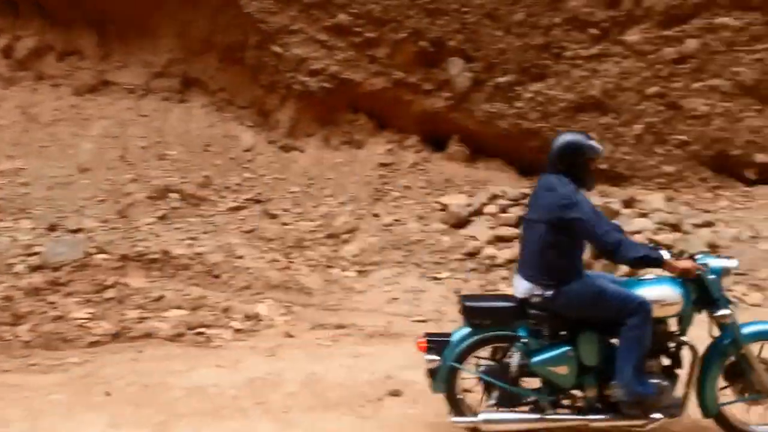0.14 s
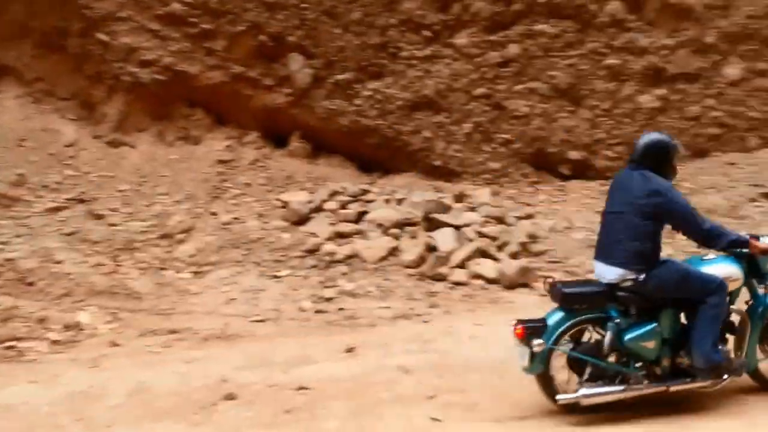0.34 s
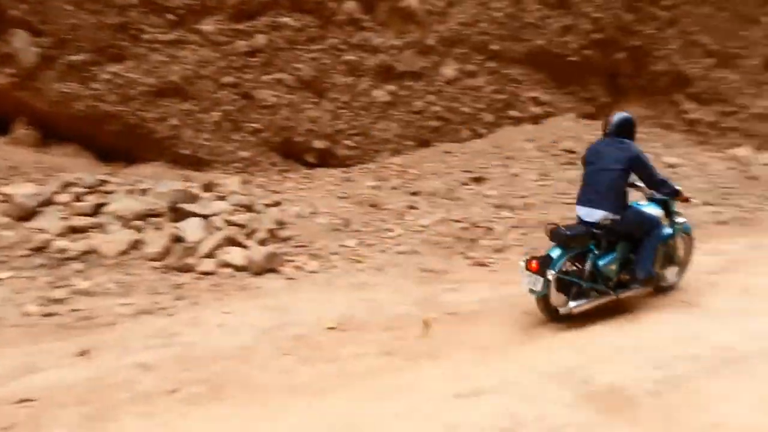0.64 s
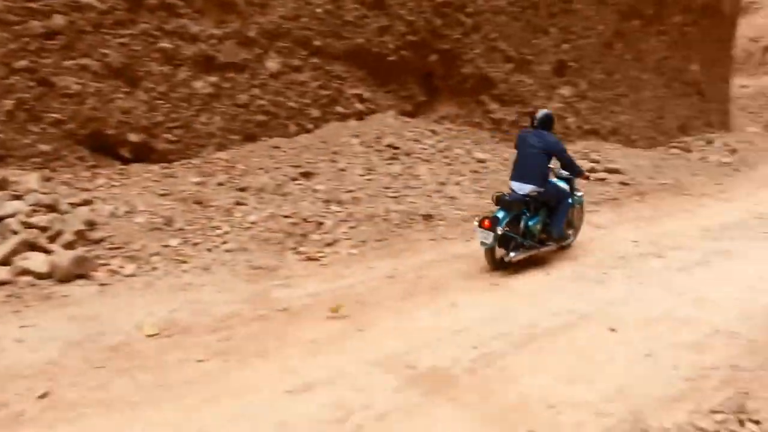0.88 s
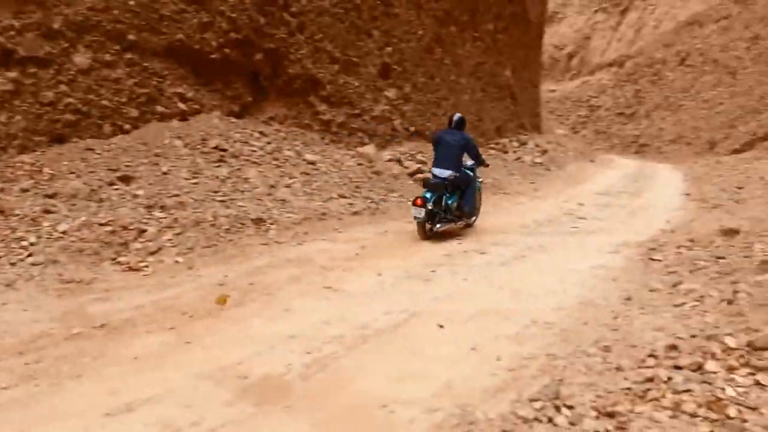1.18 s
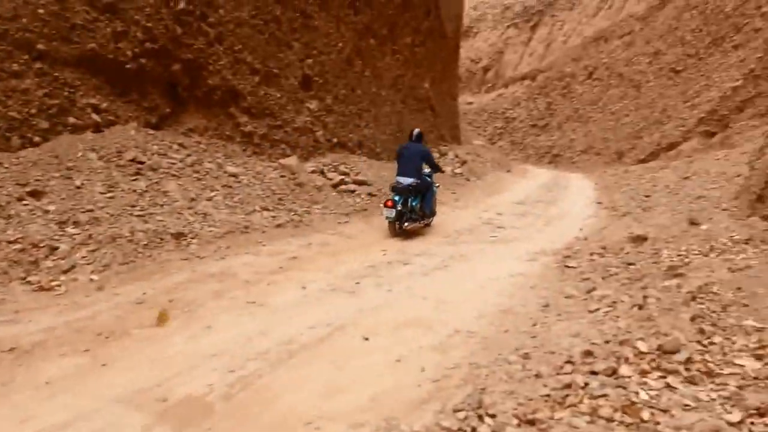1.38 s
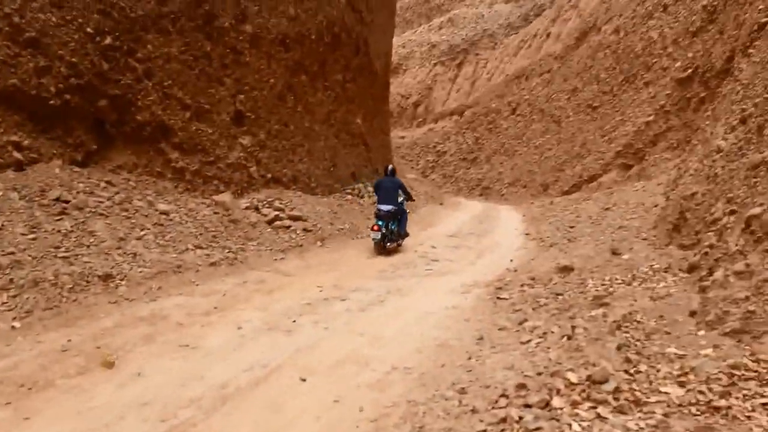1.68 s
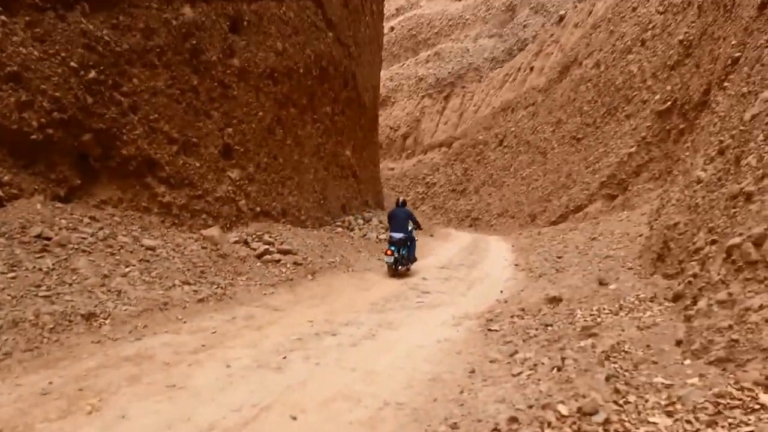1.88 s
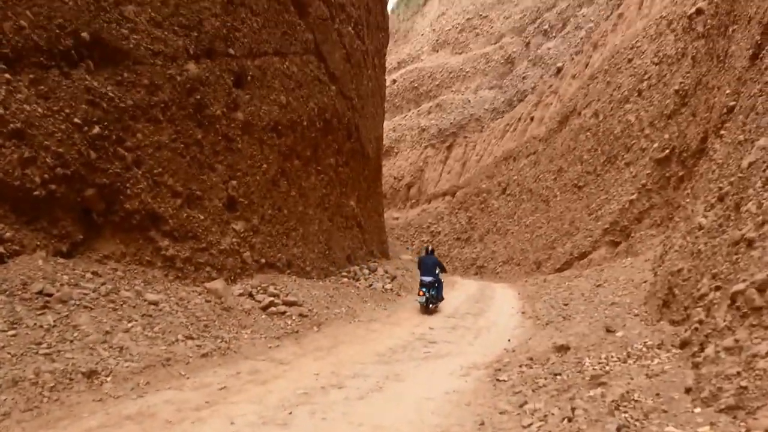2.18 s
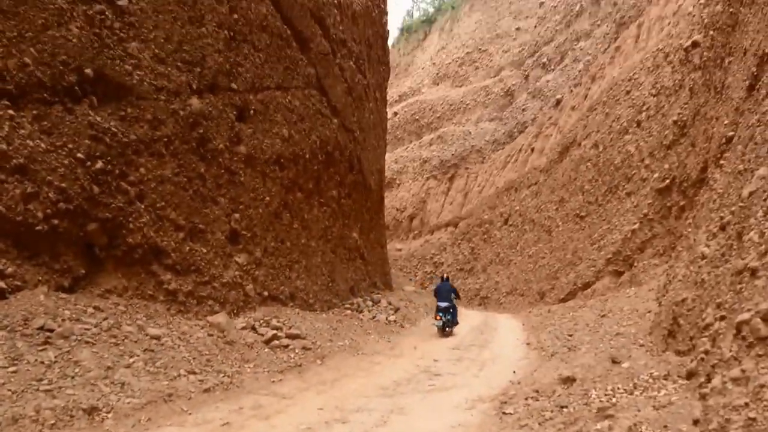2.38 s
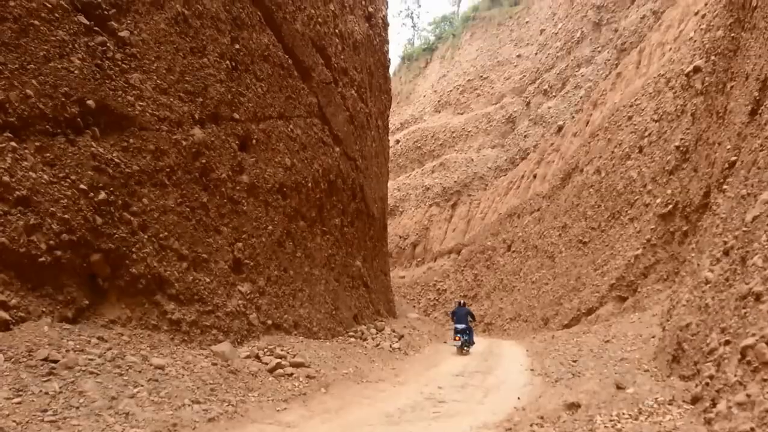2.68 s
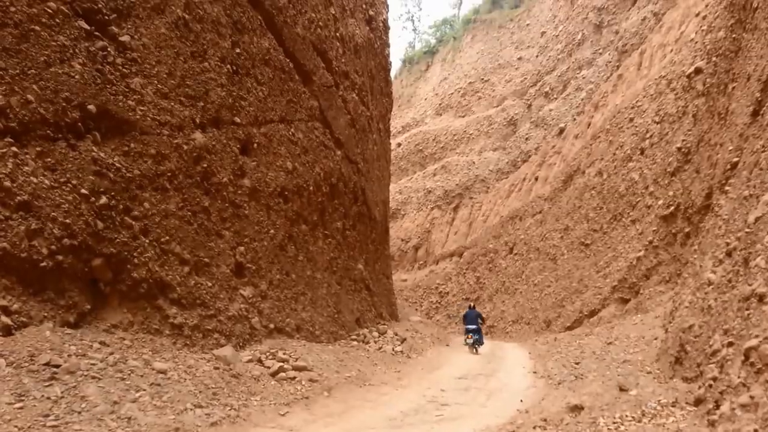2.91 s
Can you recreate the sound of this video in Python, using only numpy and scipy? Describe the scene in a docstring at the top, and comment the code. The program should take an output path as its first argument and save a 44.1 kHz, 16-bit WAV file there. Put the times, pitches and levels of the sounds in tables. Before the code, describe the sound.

A single-cylinder motorcycle thumps past very close on a dirt road, then rides away

```python
"""A dirt road between earth banks: a single-cylinder motorcycle passes close and rides off.
Each firing rings the damped modes of the exhaust pipe and cracks at its mouth as a noise burst.
The banks return delayed echoes of the thumps and a diffuse tail; a sine hum glides below them.
Shaped noise gives the rumble, the tyre and engine hiss and the gusts on one microphone port at a time.
A fast limiter clips and ducks on the loudest beats."""
import sys
import numpy as np
from scipy import signal
from scipy.fft import rfft, irfft
from scipy.io import wavfile
from scipy.ndimage import uniform_filter1d

SR = 44100
rng = np.random.default_rng(int(sys.argv[2]) if len(sys.argv) > 2 else 0)


def wrap_up_sound(samples):
    """Save the sound to the file named by the first command line argument, as 16-bit audio."""
    columns = np.atleast_2d(samples).T
    # keep every value between -1 and 1, then stretch to whole-number steps
    tamed = np.clip(columns, -1, 1)
    steps = np.round(tamed * 32767).astype(np.int16)
    wavfile.write(sys.argv[1], SR, steps)


N = 134505

# The pipe as heard while the bike turns away: (time [s], thump centre frequency [Hz],
# upper mode level re thump [dB], hum centre frequency [Hz], hum level [dB], hold of a 0 dB thump [s])
PIPE_COURSE = [(0, 165, -9, 121.7, -24.5, .003), (.7, 140, -11, 126, -25, .0055),
               (.82, 160.3, -13, 134, -16.5, .002), (1.2, 187, -17, 170, -18, .002),
               (1.5, 214.8, -27, 150, -22, .002), (1.95, 235, -14.5, 152, -22, .003),
               (2.25, 131, -4, 140, -26, .016), (3.05, 128.7, -5, 142, -29, .016)]
# Course of the noise bed: (time [s], rumble level [dB], hiss level [dB], hiss hollowness [0-1])
BED_COURSE = [(0, -22, -20.5, 0.07), (.6, -18.5, -19, 0.21), (.9, -19, -20.5, 0.16), (1.2, -17, -16, 0.35),
              (1.5, -16.5, -16.5, 0.43), (1.8, -16, -14.5, 0.6), (2.1, -16, -24, 0.33),
              (2.4, -15.5, -22.5, 0.34), (2.7, -19.5, -34, 0), (3.05, -24, -27, 0.31)]
# Relative spectrum of the full hiss, also used for cracks and grit: (frequency [Hz], level [dB])
FULL_SPECTRUM = [(200, -47), (500, 7.5), (1000, 8.5), (2200, 2.5), (4000, 2.5), (6300, 4), (7500, 2.5),
                 (9500, -11), (11000, -12), (12500, -47)]
BEAT_LEAD_S = .008  # each beat waveform starts this long before its main trough


def amp(db):
    """Decibel law: level to amplitude ratio."""
    return 10 ** (np.asarray(db) / 20)


def evened(x):
    """Normalisation to unit root-mean-square."""
    return x / np.sqrt(np.mean(x ** 2) + 1e-20)


def read(points, hz):
    """Interpolation along a logarithmic frequency axis."""
    f, value = np.transpose(points)
    return np.interp(np.log(hz + 1), np.log(f + 1), value)


def column(table, k, t):
    """Linear interpolation of column k in time."""
    rows = np.array(table)
    return np.interp(t, rows[:, 0], rows[:, k])


def add(mix, s, sound):
    """Superposition: sounds sum sample by sample, here from time s onward."""
    at = max(round(s * SR), 0)
    part = mix[at:at + len(sound)]
    part += sound[:len(part)]


def coloured(x, points):
    """Linear filtering: each spectral component is scaled by a level curve."""
    gain = amp(read(points, np.fft.rfftfreq(x.shape[-1], 1 / SR)))
    return irfft(rfft(x) * gain, x.shape[-1])


def noise(db_field, size, patchy_db, flicker_db):
    """Stereo noise as random short-time spectra with partial coherence, patches and a shared flicker."""
    # Left-right likeness of the noise: (frequency [Hz], correlation [0-1])
    likeness = [(60, 0.95), (300, 0.46), (1400, .3), (6400, 0.059)]
    # Stereo balance: (frequency [Hz], left minus right level [dB])
    balance = [(300, -1.9), (2800, 5.5), (9000, -2)]
    hop = size // 4
    frames, hz = N // hop + 5, np.fft.rfftfreq(size, 1 / SR)
    a, b, c, d, patches = rng.standard_normal((frames, len(hz), 5)).T
    patches = uniform_filter1d(patches, size=6, axis=0)  # across frequency
    patches = evened(uniform_filter1d(patches, size=8, axis=1))  # across time
    flicker = evened(uniform_filter1d(rng.standard_normal(frames), size=5))

    same = np.clip(read(likeness, hz), -1, 1)[:, None]
    lean = amp(read(balance, hz) / 2)[:, None]
    common, separate = a + 1j * b, c + 1j * d
    left = common * lean
    right = (same * common + np.sqrt(1 - same ** 2) * separate) / lean
    level_db = db_field(hz, np.arange(frames) * size / 4 / SR)
    spectra = np.array([left, right]) * amp(level_db + patchy_db * patches + flicker_db * flicker)
    return evened(signal.istft(spectra, nperseg=size, noverlap=size * 3 // 4)[1][:, :N])


def hum():
    """Frequency modulation: a wavering engine hum whose phase integrates a pitch gliding with the throttle."""
    t = np.arange(N) / SR
    waver = evened(uniform_filter1d(rng.standard_normal((2, N)), size=1500))
    hz = column(PIPE_COURSE, 3, t) * (1 + .015 * waver[0])
    level_db = column(PIPE_COURSE, 4, t) + 2.7 * waver[1]
    return amp(level_db) * np.sin(2 * np.pi * np.cumsum(hz) / SR)


def rumble():
    """Diffuse scattering: low engine noise smeared by the gully."""
    # Relative spectrum of the rumble: (frequency [Hz], level [dB])
    low_spectrum = [(40, -32), (70, -0.5), (140, 3.5), (230, -3.5), (330, -9), (600, -17), (1200, -23.5),
                    (3000, -98)]

    def field(hz, t):
        return read(low_spectrum, hz)[:, None] + 0 * t

    bed = noise(field, size=1024, patchy_db=1.5, flicker_db=4.5)
    return amp(column(BED_COURSE, 1, np.arange(N) / SR)) * bed


def hiss():
    """Broadband friction and impact noise: tyre and engine hiss turning from full to hollow, with grit snaps."""
    # Relative spectrum of the thin, hollow hiss: (frequency [Hz], level [dB])
    hollow_spectrum = [(500, -16), (1000, -49), (2200, -22), (4000, -28), (6300, -13.5), (9500, -28),
                       (11000, -65)]
    grit_per_s, grit_db = 420, -13  # mean snap rate, level re wash

    def field(hz, t):
        hollow = np.clip(column(BED_COURSE, 3, t), 0, 1)
        full_part = read(FULL_SPECTRUM, hz)[:, None] * (1 - hollow)
        return full_part + read(hollow_spectrum, hz)[:, None] * hollow

    wash = noise(field, size=256, patchy_db=1.78, flicker_db=2.0)
    snap_sizes = amp(1.9 * np.minimum(rng.exponential(1, N), 5))
    snaps = snap_sizes * (rng.random(N) < grit_per_s / SR)
    bursts = uniform_filter1d(snaps, size=60) * rng.standard_normal((2, N))
    grit = evened(coloured(bursts, FULL_SPECTRUM))
    return amp(column(BED_COURSE, 2, np.arange(N) / SR)) * (wash + amp(grit_db) * grit)


def ring(t, hz, db, t60, hold_s=.002):
    """Damped resonance: a mode with its trough at t = 0 swells, holds, then falls 60 dB in t60 seconds."""
    rise = np.exp(-.5 * (np.minimum(t, 0) / .002) ** 2)  # Gaussian swell, 2 ms wide
    decay = amp(db - 60 * np.maximum(t - hold_s, 0) / t60)
    return -rise * decay * np.cos(2 * np.pi * hz * t)


def beat(s, thump_db, boom_db, rasp_db, luck):
    """Modal superposition: one firing excites the low pipe modes, and a throaty rasp just behind them."""
    t = np.arange(-BEAT_LEAD_S, .2, 1 / SR)
    hold_s = column(PIPE_COURSE, 5, s) * amp(thump_db)  # harder firings ring longer
    thump_hz = column(PIPE_COURSE, 1, s) * (1 + .05 * luck[0])
    thump = ring(t, thump_hz, thump_db, .025, hold_s)
    boom = ring(t, 88, boom_db, .075)
    upper = ring(t, 322, thump_db + column(PIPE_COURSE, 2, s), .02)

    late_t = t - .002
    shift = 1 + .12 * luck[1]  # both rasp modes wander together
    rasp = ring(late_t, 673 * shift, rasp_db, .01) + ring(late_t, 1076 * shift, rasp_db - 6, .01)
    return thump + boom + upper, rasp


def cracks(count):
    """Turbulent jet noise: stereo bursts at the pipe mouth, half shared by both sides, dying exponentially."""
    n = np.arange(1024)
    bursts = coloured(rng.standard_normal((count, 3, 1024)), FULL_SPECTRUM)
    stereo = evened(bursts[:, :2] + bursts[:, 2:])
    attack = np.minimum(n / 20, 1)
    return stereo * amp(-60 * n / SR / .023) * attack  # falls 60 dB in 23 ms


def diffuse_tail(direct):
    """Reverberation: convolution with exponentially decaying, partly coherent noise."""
    t60, same = .35, .6  # [s], share of tail power common to both sides
    t = np.arange(SR // 2) / SR
    taps = rng.standard_normal((3, len(t))) * amp(-60 * t / t60) * (t > .02)
    taps = np.sqrt(same) * taps[2] + np.sqrt(1 - same) * taps[:2]
    return signal.fftconvolve(direct[None], taps / np.linalg.norm(taps[0]), axes=1)[:, :N]


def exhaust():
    """Direct sound and reflection: beats and cracks, dull echoes off the banks, and a diffuse tail."""
    # Engine firings: (time [s], thump level [dB], boom level [dB], rasp level [dB], crack level [dB])
    firings = [(0.021, -8.5, -8.5, -38, -14), (0.0989, -5, -12, -24, -6), (0.173, -8, -8.5, -38, -36),
               (0.2445, 1.5, -7, -24, -4), (0.3159, -7, -9, -24, -15), (0.3869, -7.5, -8.5, -24, -28),
               (0.4586, 4, -3, -20, -4), (0.5386, -7, -9.5, -19, -30), (0.6055, -1, -9, -20, -9),
               (0.6819, 4, -9, -16, -6), (0.7516, -8.5, -12, -15, -33), (0.8212, -1, -11, -17, -13),
               (0.8934, -6, -17, -16, -25), (0.9634, -6, -19, -18, -20.5), (1.0358, -0.5, -13, -10, -6.5),
               (1.1042, -4.5, -20, -19.5, -14), (1.169, -4.5, -31, -15, -26),
               (1.2306, -1.5, -13, -19, -17.5), (1.2943, -4, -33, -20.5, -10.5),
               (1.354, -1, -6.5, -17, -7.5), (1.4155, -1, -5.5, -21, -21), (1.4816, 1.5, -9, -7.5, -8.5),
               (1.5513, -5.5, -11, -12, -11.5), (1.617, -4.5, -9, -24, -13.5),
               (1.6884, -5, -5.5, -17.5, -13.5), (1.7563, -5, -10, -12.5, -11),
               (1.816, -6.5, -11, -25, -17), (1.8855, -3, -4.5, -31, -16), (1.956, -3.5, -11, -12, -17.5),
               (2.0236, -8, -4.5, -17, -17.5), (2.089, -9.5, -11, -23, -21), (2.1585, -10, -5, -21, -22.5),
               (2.224, -9.5, -8, -20.5, -21), (2.2918, -6, -13, -25, -16.5), (2.3599, -7, -12, -19, -22.5),
               (2.4278, -8, -18, -13.5, -28), (2.492, -6.5, -18, -19, -26.5), (2.5634, -6, -13, -20, -25.5),
               (2.6318, -5, -11, -21, -20), (2.6978, -6, -17, -24, -32.5), (2.7691, -6, -30, -21, -24),
               (2.8306, -8, -37, -29, -29.5), (2.8923, -10, -32, -38, -33), (2.9684, -10, -12, -32, -40),
               (3.0398, -6.5, -29, -25, -25)]
    # Mean echoes off the banks, before fading: (delay [s], left level [dB], right level [dB])
    echoes = [(.023, -11.5, -12.5), (0.032, -9, -13), (0.041, -10.5, -12)]
    wander_s, spread_db, fade_db_per_s = .003, 2.5, 2.5  # echo delay and level scatter; fade of echoes and tail
    crack_lead_s = .0026
    direct, out = np.zeros(N), np.zeros((2, N))
    echo_luck = rng.standard_normal((len(firings), len(echoes), 2))
    puffs = cracks(len(firings))
    pitch_luck = rng.standard_normal((len(firings), 2))

    for firing, chance, puff, luck in zip(firings, echo_luck, puffs, pitch_luck):
        s, thump_db, boom_db, rasp_db, crack_db = firing
        low, rasp = beat(s, thump_db, boom_db, rasp_db, luck)
        start = s - BEAT_LEAD_S
        add(direct, start, low)
        for side in (0, 1):
            add(out[side], start, rasp)
            add(out[side], s - crack_lead_s, amp(crack_db) * puff[side])
            for echo, (late, loud) in zip(echoes, chance):
                delay_s = echo[0] + wander_s * late
                echo_db = echo[1 + side] + spread_db * loud - fade_db_per_s * s
                add(out[side], start + delay_s, amp(echo_db) * low)

    tail_db = -9 - fade_db_per_s * np.arange(N) / SR
    return direct + out + amp(tail_db) * diffuse_tail(direct)


def wind():
    """Turbulent pressure fluctuation: lumpy low buffeting lands on one port."""
    # Gusts on a port: (start [s], length [s], level [dB], port [0 left, 1 right])
    gust_list = [(1.88, .1, -15.5, 0), (2.03, .2, -14, 0), (2.22, .18, -14.5, 0), (2.4, .06, -10, 1),
                 (2.78, .27, -15, 0)]
    # Relative spectrum of the buffeting: (frequency [Hz], level [dB])
    buffet_spectrum = [(50, -16), (200, 6.5), (350, -1), (700, -15), (1500, -66)]
    out = np.zeros((2, N))
    lumps = amp(2.2 * evened(uniform_filter1d(rng.standard_normal(N), size=500)))
    air = evened(lumps * coloured(rng.standard_normal(N), buffet_spectrum))
    for start, length, db, port in gust_list:
        u = np.clip((np.arange(N) / SR - start) / length, 0, 1)
        swell = np.sqrt(abs(np.sin(np.pi * u)))
        out[round(port)] += amp(db) * swell * air
    return out


def scene():
    """Linear superposition of all sources."""
    return exhaust() + hum() + rumble() + hiss() + wind()


def limiter(x):
    """Delayed gain control: it reacts a few ms late, so loud beats clip first and leave a hole after."""
    threshold_db, range_db, cut_per_db = -2, 4, 1.8  # range caps the overshoot that is counted
    fall_s, recover_s = .0065, .008  # time constants
    peak = abs(uniform_filter1d(x, size=30)).max(0)  # both channels share one gain
    over_db = np.clip(20 * np.log10(peak + 1e-9) - threshold_db, 0, range_db)
    # Peak hold with exponential release, as a running maximum in the log domain
    release = np.arange(N) / SR / recover_s
    held_db = np.exp(np.maximum.accumulate(np.log(over_db + 1e-9) + release) - release)
    r = np.exp(-1 / (fall_s * SR))
    smooth_db = signal.lfilter([1 - r], [1, -r], held_db)
    smooth_db = signal.lfilter([1 - r], [1, -r], smooth_db)
    return np.clip(x / amp(cut_per_db * smooth_db), -.99, .99)


def record(dry):
    """Band limitation around a nonlinearity: bass cut, late limiter, then a steep treble edge."""
    bass_cut = signal.butter(2, 50, "high", fs=SR, output="sos")
    clipped = limiter(signal.sosfiltfilt(bass_cut, dry))
    treble_edge = signal.firwin(255, 14600, window=("kaiser", 9), fs=SR)
    return np.clip(signal.oaconvolve(clipped, treble_edge[None], "same"), -1, 1)


dry = scene()
out = record(dry)
wrap_up_sound(out)
```